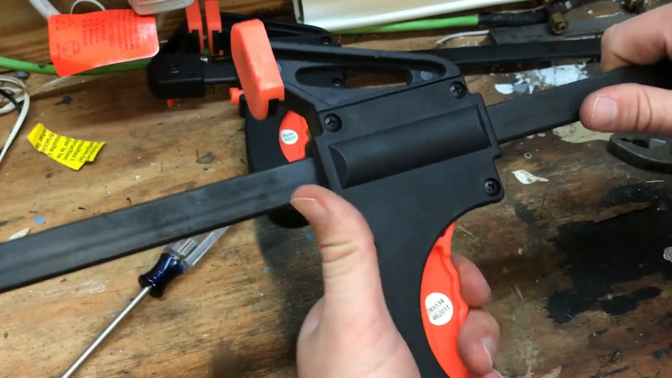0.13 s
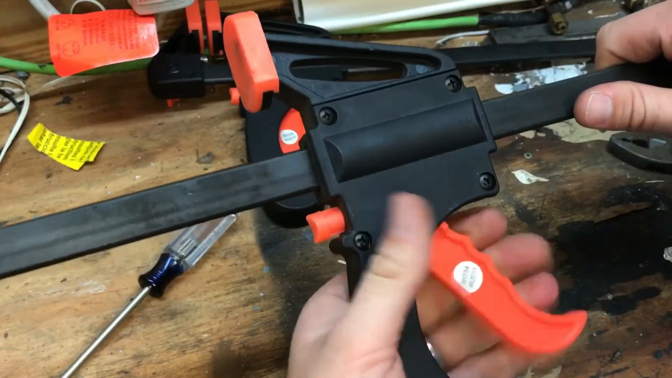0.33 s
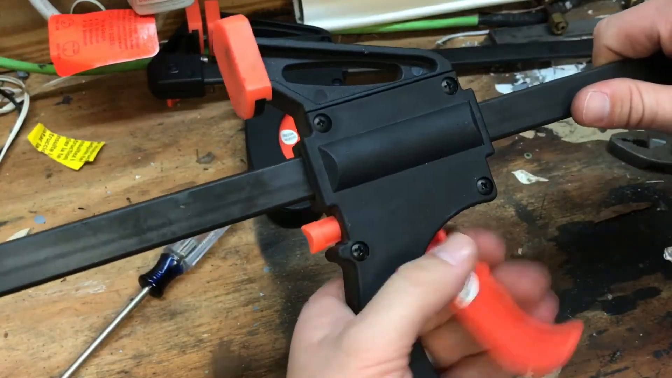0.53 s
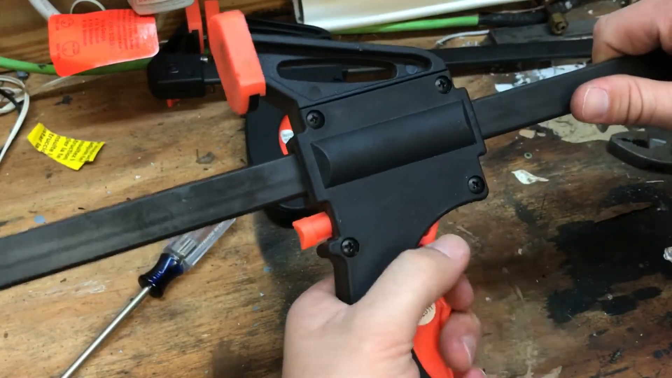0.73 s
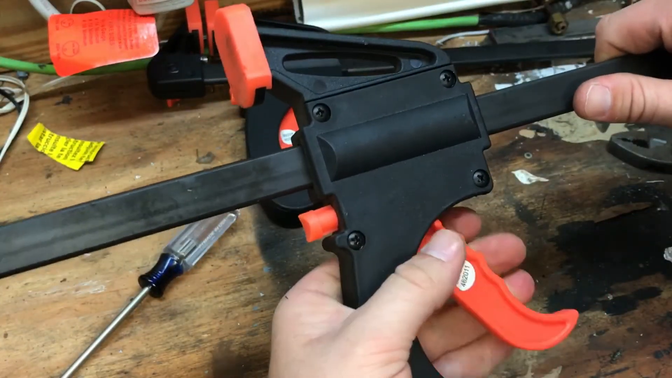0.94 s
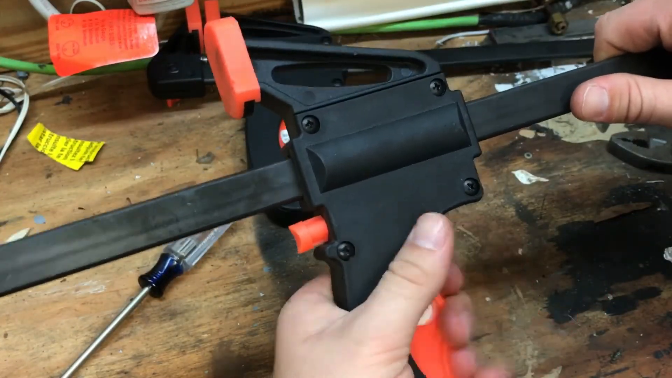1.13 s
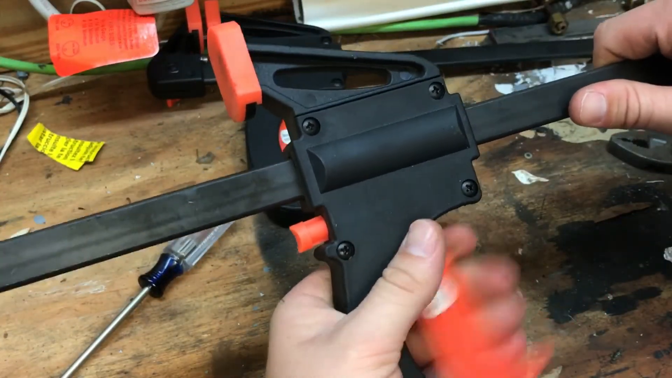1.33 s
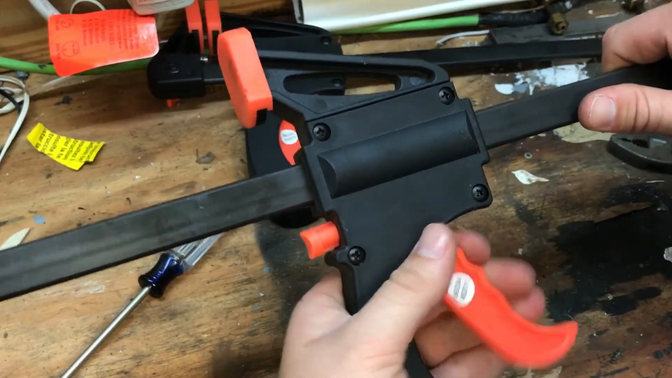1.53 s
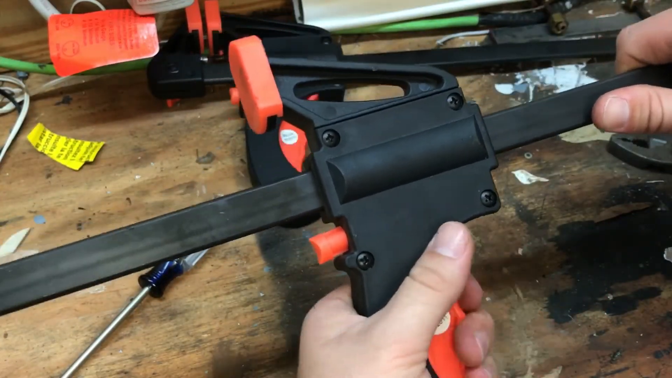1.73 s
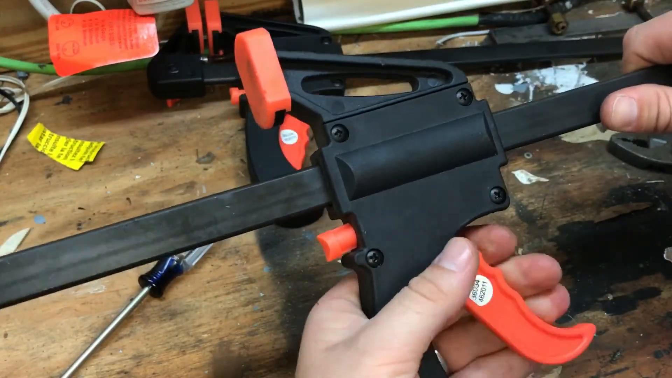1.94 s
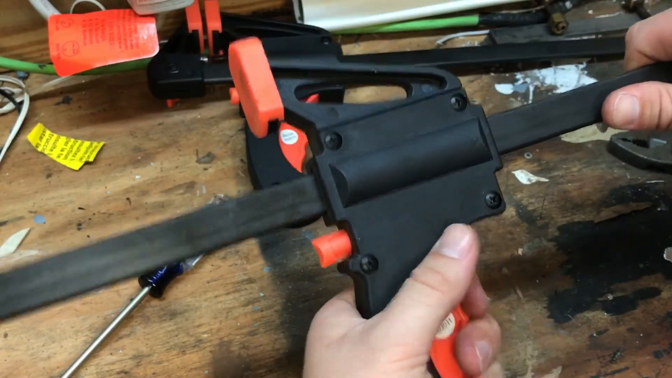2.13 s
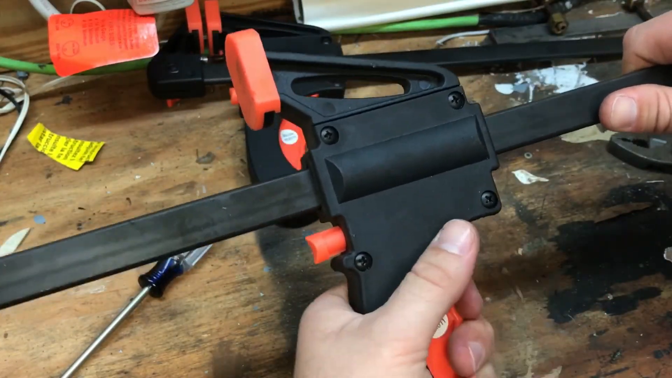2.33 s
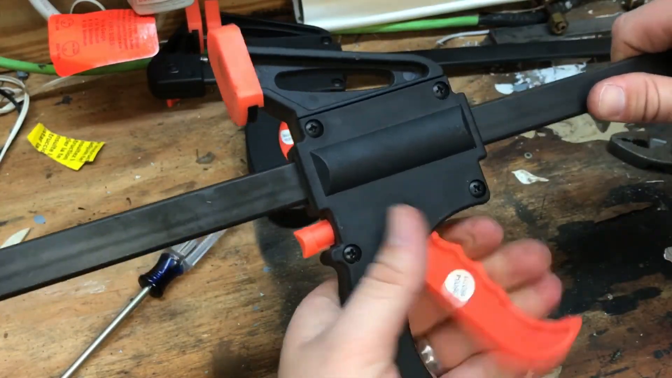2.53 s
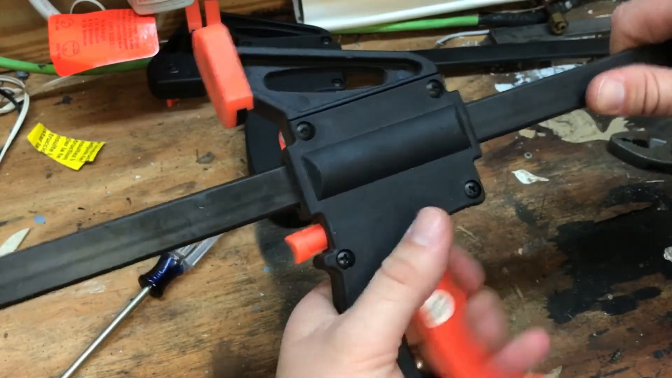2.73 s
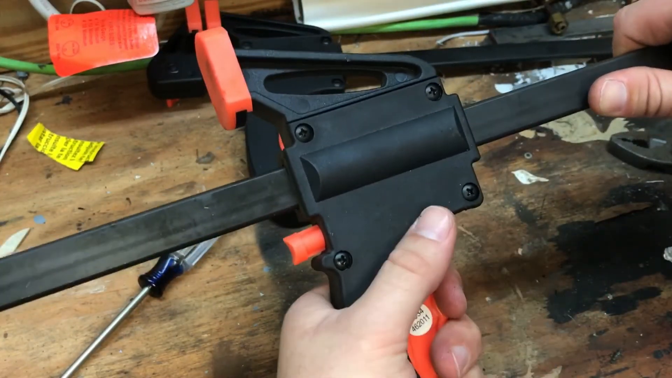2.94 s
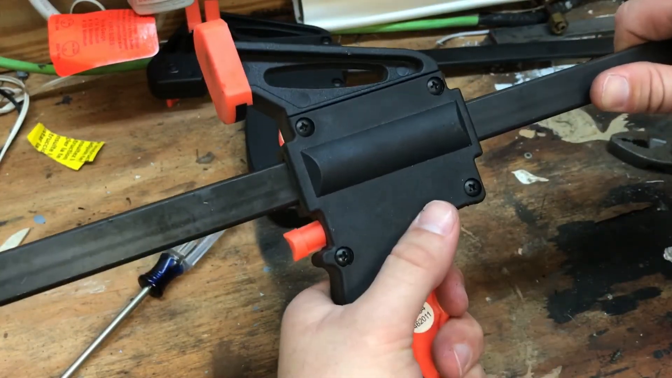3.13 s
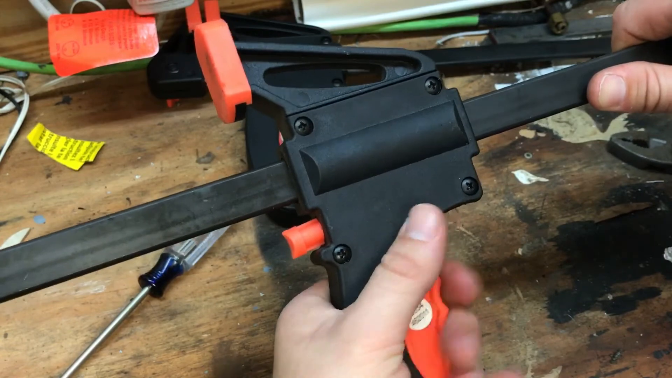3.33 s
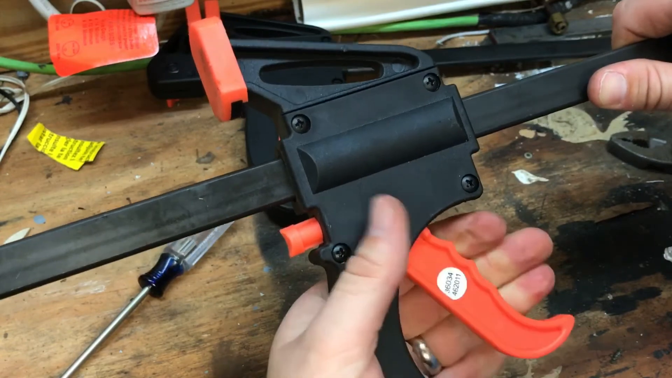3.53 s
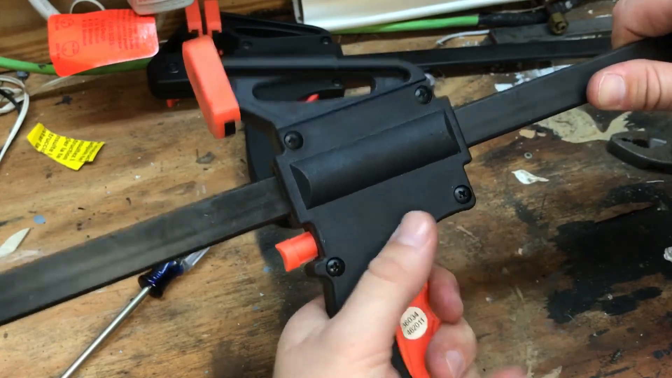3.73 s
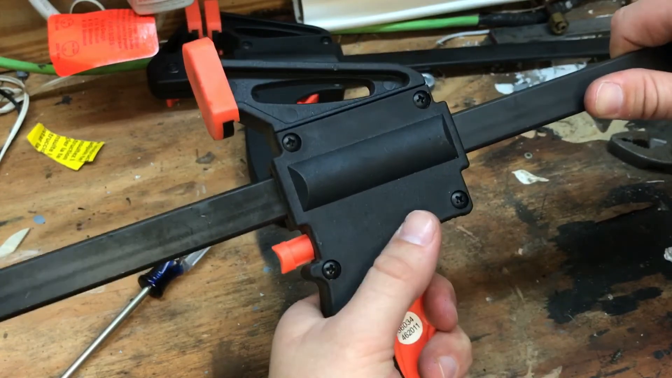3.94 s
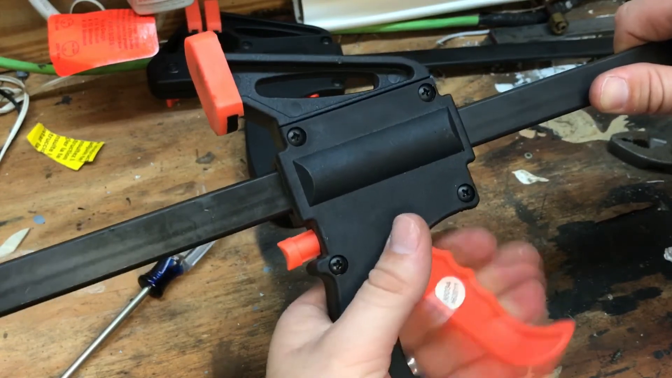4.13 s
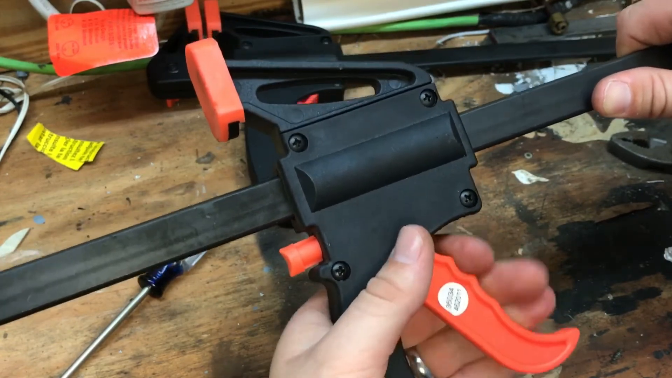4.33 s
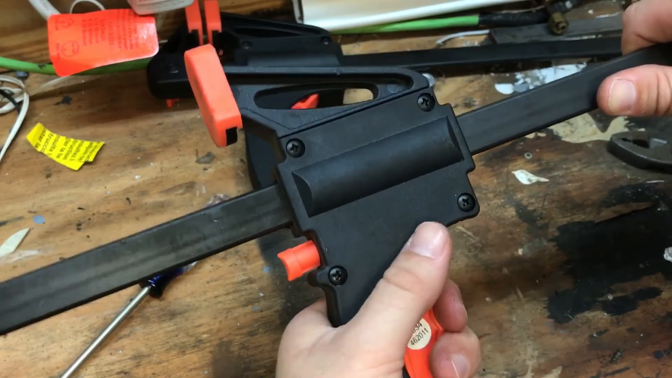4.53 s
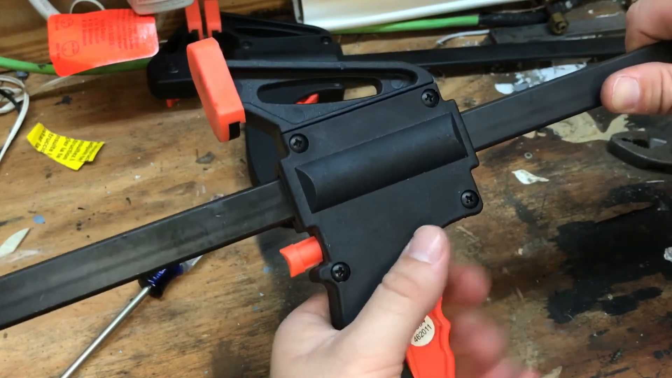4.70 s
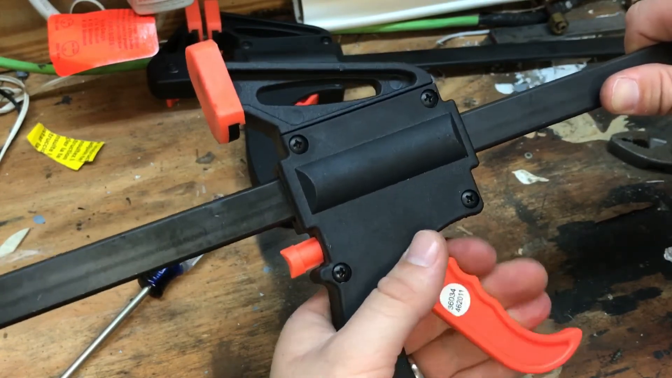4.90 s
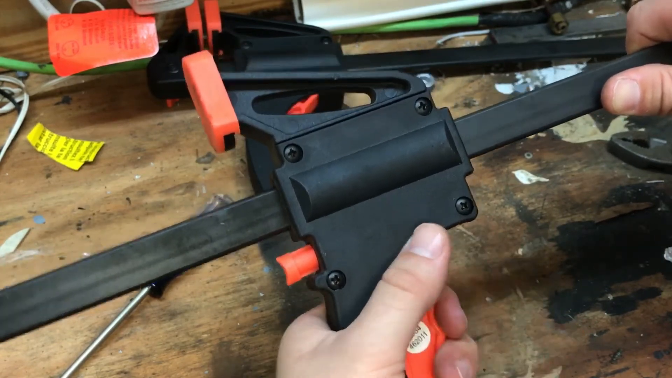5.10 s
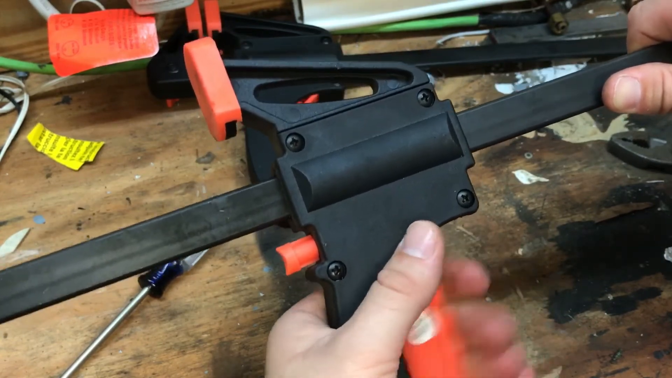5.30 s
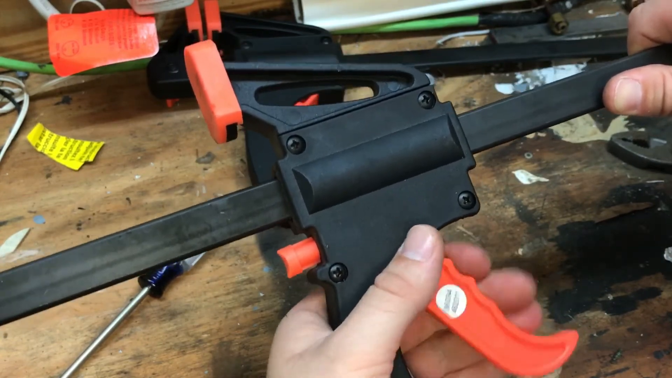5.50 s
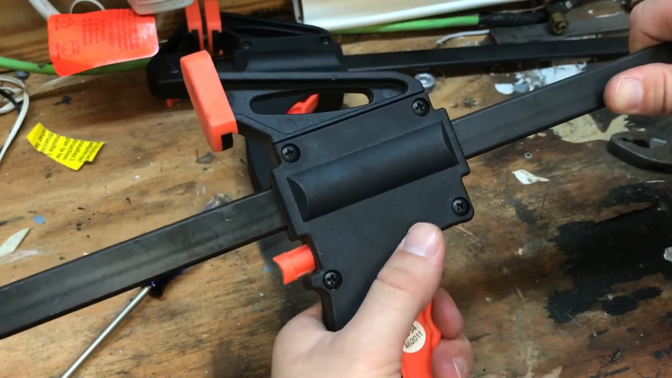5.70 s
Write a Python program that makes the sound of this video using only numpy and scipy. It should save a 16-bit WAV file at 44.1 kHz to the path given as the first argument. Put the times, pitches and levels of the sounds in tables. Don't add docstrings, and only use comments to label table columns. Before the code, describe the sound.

Dry mono close-up in a small workshop: loud, crisp plastic snaps alternate with quieter clicks and knocks as a clamp trigger is squeezed and released in uneven rhythm. Faint skin and plate scraping fills the movements, and a thin spring tone lingers after the snaps until the next squeeze stops it. Low duct rumble continues underneath, with a soft far-off horn chord near the end.

```python
import sys
import numpy as np
from scipy import signal
from scipy.fft import rfft, irfft, next_fast_len
from scipy.io import wavfile
from scipy.ndimage import uniform_filter1d

SR = 44100
rng = np.random.default_rng(int(sys.argv[2]) if len(sys.argv) > 2 else 0)


def transcribe(u):
    v = np.clip(np.atleast_2d(u).T, -1, 1)
    q = np.round(v * 32767).astype(np.int16)
    wavfile.write(sys.argv[1], SR, q)


def amplitude_ratio(level_db):
    exponent = np.asarray(level_db, float) / 20
    return 10 ** exponent


N = 254057


def level(x, db):
    return x * amplitude_ratio(db) / np.sqrt(np.mean(x ** 2))


def colour(x, points):
    hz, db = np.transpose(points)
    size = next_fast_len(x.shape[-1])
    f = np.fft.rfftfreq(size, 1 / SR) + 1
    gain = amplitude_ratio(np.interp(np.log(f), np.log(hz), db))
    return irfft(rfft(x, size) * gain, size)[:x.shape[-1]]


def curve(rows):
    return np.interp(np.arange(N) / SR, *np.transpose(rows))


def fade(t, t60):
    return np.exp(-np.log(1000) * t / t60)


def add(out, s, x):
    i = int(s * SR)
    out[i:i + len(x)] += x[:N - i]


def walk(rate):
    k = int(SR / rate)
    held = np.repeat(rng.standard_normal(N // k + 1), k)
    return uniform_filter1d(uniform_filter1d(held, k), k)[:N]


def air():
    # frequency in Hz, density in dB per Hz.
    flow_colour = [(18, -37), (33, -8), (42, -3), (60, -2.5), (89, -5), (255, -19.5), (359, -20.5),
                   (732, -39), (1060, -35.5), (1660, -40.5), (4900, -50), (12300, -48.5), (15200, -47.5),
                   (16500, -72.5)]
    # frequency in Hz, width in Hz, level in dB.
    ducts = [(58, 9.6, -61), (110.2, 0.53, -63)]
    out = level(colour(rng.standard_normal(N), flow_colour), -59)
    for hz, width, db in ducts:
        resonance = signal.lfilter(*signal.iirpeak(hz, hz / width, SR), rng.standard_normal(N))
        out += level(resonance, db) * amplitude_ratio(2.9 * walk(0.65))
    return out


def horn():
    # time in seconds, level in dB.
    blast = [
        (4.33, -87),
        (4.38, -60.5),
        (4.7, -61),
        (4.97, -62.5),
        (5.03, -91),
    ]
    # fundamental in Hz, level in dB, octave above in dB relative to the fundamental.
    pipes = [(316.5, 0, -14), (388.5, -6, -10), (510, -12, -15)]
    t = np.arange(N) / SR
    chord = np.zeros(N)
    for f, db, octave_db in pipes:
        tone = np.sin(2 * np.pi * f * t) + amplitude_ratio(octave_db) * np.sin(4 * np.pi * f * t)
        chord += amplitude_ratio(db + 1.7 * walk(12)) * tone
    sounding = (t > blast[0][0]) * (t < blast[-1][0])
    return amplitude_ratio(curve(blast)) * sounding * chord


def room(x):
    # frequency in Hz, t60 in seconds.
    decay = [(300, 0.15), (1000, 0.22), (3000, 0.23), (8000, 0.18), (15000, 0.4)]
    decay_hz, decay_s = np.transpose(decay)
    t = np.arange(SR // 2) / SR
    tail = 0
    for hz in 250 * 2 ** np.arange(0, 6.1, .5):
        t60 = np.interp(np.log(hz), np.log(decay_hz), decay_s)
        band = signal.lfilter(*signal.iirpeak(hz, 2.8, SR), rng.standard_normal((2, len(t))))
        tail = tail + band * fade(t, t60)
    tail = tail * np.clip(t / 0.004, 0, 1)
    tail = amplitude_ratio(-13.5) * tail / np.sqrt(np.sum(tail ** 2) / 2)
    x = x * (.35 + 1.3 * walk(900))
    one, other = signal.fftconvolve(x[None], tail, axes=1)[:, :N]
    turn = 2 * np.pi * .6 * walk(120)
    return one * np.cos(turn) + other * np.sin(turn)


def spring():
    # struck at s, caught by the hand at s, level in dB.
    rings = [(.414, 0.674, -56), (.986, 1.15, -57.5), (1.437, 1.67, -54), (1.956, 2.134, -64),
             (2.617, 2.767, -64.5), (3.517, 3.74, -62.5), (4.215, 4.443, -53), (4.84, 5.022, -53.5),
             (5.426, 5.61, -64)]
    # frequency in Hz, level in dB, t60 in seconds.
    modes = [
        (875.7, 0, 1.2),
        (837, -8, .7),
        (1989, -11, .4),
        (945, -10, .25),
    ]
    out = np.zeros(N)
    for start, stop, db in rings:
        t = np.arange(int((stop - start) * SR)) / SR
        ring = np.zeros(len(t))
        for hz, mode_db, t60 in modes:
            ring += amplitude_ratio(mode_db) * np.sin(2 * np.pi * (hz * t + rng.random())) * fade(t, t60)
        caught = np.clip((t[-1] - t) / 0.0041, 0, 1)
        add(out, start, amplitude_ratio(db) * ring * caught)
    return out


def hand():
    # start in seconds, end in seconds, level at start in dB, level at end in dB.
    moves = [(0., 0.095, -57, -74), (0.35, 0.742, -76.5, -90.5), (0.832, 0.984, -75.5, -62.5),
             (0.96, 1.373, -68.5, -69.5), (1.354, 1.748, -68, -70.5), (1.75, 2.094, -68, -77.5),
             (2.106, 2.23, -64, -76), (2.522, 2.698, -66.5, -71.5), (2.754, 2.889, -69, -67.5),
             (3.375, 3.522, -71, -70), (3.526, 3.664, -50.5, -71), (3.676, 3.937, -70, -68.5),
             (4.107, 4.22, -76, -69), (4.198, 4.597, -67, -94.5), (4.74, 4.857, -80.5, -62.5),
             (4.839, 5.249, -71, -69.5), (5.32, 5.437, -73, -58.5), (5.44, 5.755, -79.5, -95)]
    t = np.arange(N) / SR
    gain = np.zeros(N)
    for a, b, start_db, end_db in moves:
        moving = np.clip(np.minimum(t - a, b - t) / 0.0072 + .5, 0, 1)
        gain += amplitude_ratio(np.interp(t, (a, b), (start_db, end_db))) * moving
    return gain


def scrape():
    # start in seconds, end in seconds,
    # level in dB.
    skids = [(0.05, 0.07, -50), (0.37, 0.411, -49.5), (0.665, 0.697, -51.5), (1.204, 1.22, -38.5),
             (1.389, 1.467, -52.5), (1.699, 1.716, -44.5), (2.174, 2.191, -43.5), (2.825, 2.844, -47.5),
             (3.792, 3.806, -57), (2.574, 2.58, -54), (4.522, 4.535, -47), (5.092, 5.111, -42),
             (5.673, 5.683, -41)]
    # frequency in Hz, density in dB per Hz.
    skid_colour = [(240, -57.5), (400, -5.5), (1580, -13.5), (2510, -15.5), (3020, -4.5), (4310, -8),
                   (4950, -21.5), (6340, -13), (12900, -24), (16000, -39)]
    # frequency in Hz, density in dB per Hz.
    creep_colour = [(300, -9.5), (1000, 5), (2000, 1.5), (5000, -0.5), (9000, -6.5), (11000, -5),
                    (12200, -7), (14000, -5), (16000, -11)]
    t = np.arange(N) / SR
    grit = rng.standard_normal(N) * amplitude_ratio(6 * walk(300))
    skidding = sum(amplitude_ratio(db) * np.clip(np.minimum(t - a, b - t) / 0.0024, 0, 1) for a, b, db in skids)
    creep = level(colour(rng.standard_normal(N), creep_colour), 0) * hand() * amplitude_ratio(1.8 * walk(6.7))
    return level(colour(grit, skid_colour), 0) * skidding + creep


def contacts():
    # time in seconds, peak in dB, sharp edge in dB.
    ticks = [(0.009, -41, -4), (.022, -53, -12), (0.088, -51, -51), (0.2642, -51, 1), (0.3197, -73, -5),
             (0.3284, -52, -2), (0.8884, -53.5, 2.5), (1.3867, -40.5, -7), (1.63, -48.5, 1),
             (1.857, -57, 2), (1.892, -50.5, -1.5), (2.524, -55.5, 8), (2.55, -53.5, -19),
             (3.06, -67.5, -4), (3.3782, -52.5, -6.5), (3.3844, -54, -5), (3.435, -55, 8.5),
             (3.9002, -56, 2), (4.134, -56, 5), (4.1387, -57, 4), (4.147, -58.5, -9.5),
             (4.1873, -47.5, -10.5), (4.746, -54, 5), (4.761, -52, -9), (4.771, -53.5, -3.5),
             (4.803, -50, -2), (5.3214, -49, 1.5), (5.377, -50, -10), (3.7183, -49.5, -13),
             (4.573, -51.5, -35)]
    # time in seconds, peak in dB, strongest ring in Hz.
    take_ups = [(0.613, -46, 1300), (0.627, -46.5, 2110), (1.137, -44, 1300), (1.1468, -39, 1670),
                (1.62, -49, 1260), (1.6334, -49, 2190), (1.639, -49, 1170), (2.102, -44, 3310),
                (2.1157, -48, 2110), (2.7616, -45, 1900), (2.772, -45, 1300), (2.7745, -43, 1990),
                (3.7339, -34.5, 3280), (3.746, -40, 2010), (4.44, -49, 1500), (4.451, -43.5, 1630),
                (4.4563, -40.5, 1550), (5.0223, -40.5, 3090), (5.034, -47.5, 2140), (5.0384, -45, 1850),
                (5.5947, -33.5, 3480), (5.612, -36, 1820)]
    # time in seconds, peak in dB, strongest ring in Hz, edge in dB.
    bites = [(0.049, -58, 3230, 12.5), (0.635, -35, 4070, -2), (0.6408, -28.5, 1760, -1),
             (1.158, -32, 3200, -10), (1.1657, -28, 920, -2), (1.208, -31.5, 2920, -19),
             (1.6464, -35.5, 4250, -5), (1.655, -28, 1770, -2.5), (1.701, -35, 2980, -20),
             (2.128, -30.5, 4150, -1), (2.134, -31.5, 1720, -3.5), (2.7835, -39, 1680, -2),
             (2.7917, -29.5, 1740, -5), (2.7982, -43, 1730, -8), (3.7551, -35, 1043, -7),
             (3.7574, -44.5, 1370, 7.5), (4.4644, -37, 1350, -17), (4.4726, -39, 1670, -3.5),
             (5.0472, -39, 2000, -9), (5.056, -40, 1075, -7), (5.6216, -33.5, 2020, -22),
             (5.627, -30.5, 1390, -8.5)]
    # time in seconds, peak in dB, sharp edge in dB.
    stops = [(0.0607, -48, -7), (0.6626, -62, 14), (0.6677, -62, 1), (0.6832, -47.5, 0),
             (0.7057, -50.5, -29), (1.1949, -31.5, -14), (1.6876, -23.5, -10), (2.1678, -31, -13),
             (2.2251, -66.5, -24), (2.8252, -47, -10.5), (2.833, -59, -7), (2.8399, -38, -22),
             (2.8646, -48.5, -33), (3.8012, -34.5, -25), (3.833, -54, -24), (4.5132, -33, -11),
             (4.525, -35, -6), (4.5317, -35.5, -21), (5.078, -66, 18), (5.0903, -21.5, -11),
             (5.1073, -33.5, -30.5), (5.6611, -22.5, -6), (5.6781, -37.5, -19)]
    # time in seconds,
    # peak in dB.
    rebounds = [(3.5, -35), (5.1, -42), (2.1811, -38), (.4395, -51), (5.1445, -64.5)]
    # time in seconds, peak in dB, strongest ring in Hz,
    # chatter in ms.
    slips = [(0.3748, -32.5, 1480, 7.9), (0.398, -37.5, 1630, 2.1), (0.956, -40.5, 1330, 5.1),
             (0.9677, -24.5, 1136, 2.8), (0.9746, -25.5, 1320, 1.9), (1.3973, -38.5, 1500, 1.3),
             (1.409, -54.5, 2510, 11), (1.422, -31.5, 1270, 1.2), (1.9109, -37.5, 4336, 5.4),
             (1.9222, -37, 1073, 0.45), (1.9366, -36, 1350, 5), (1.948, -41.5, 1837, 5.8),
             (2.579, -34.5, 1566, 5.6), (2.5998, -31, 1345, 5), (3.4392, -49.5, 1584, 2.6),
             (3.493, -39, 1536, 0.37), (3.495, -36, 1360, 0.8), (3.5028, -34.5, 3090, 4.4),
             (4.1954, -34, 1270, 4.2), (4.2253, -24, 1104, 1), (4.8148, -33.5, 1590, 24),
             (4.8256, -28, 1300, 0.67), (5.386, -36.5, 1530, 1.6), (5.396, -40, 1410, 0.67),
             (5.4068, -32, 1225, 2.3)]
    # time in seconds, peak in dB, strongest ring in Hz, edge in dB,
    # chatter in ms.
    snaps = [(0.4134, -11.5, 1637, -6, 2.63), (0.9848, -10, 1995, -2, 4.67), (1.4363, -8, 3670, -4, 1.57),
             (1.9549, -14.5, 1240, -6, 2.08), (2.6153, -15.5, 1140, -10.5, 2.6),
             (3.51, -15, 4160, -12.5, 1.76), (3.5148, -11, 1927, 2.6, 1.74), (3.5264, -10, 2100, -0.5, 1.4),
             (4.2086, -17.5, 3730, -7.5, 2.7), (4.2172, -10.5, 1282, -6, 0.6),
             (4.8407, -12, 1190, -3.5, 3.9), (5.4255, -19, 1300, -4.5, 1.8)]
    # time in seconds, peak in dB, strongest ring in Hz, edge in dB.
    jumps = [(0.9965, -24.5, 3400, -9.5), (1.429, -40, 2170, 2), (1.4419, -24.5, 6800, -1),
             (1.9393, -32.5, 1300, -6.5), (3.5186, -16.5, 1500, -5), (3.5231, -20.5, 1300, -3),
             (3.5383, -21.5, 2200, -3), (4.2235, -25, 6740, -3.5), (4.2336, -31, 1100, -15),
             (5.4213, -35, 2220, -7.5), (5.4337, -31.5, 1300, -9.5)]
    rows = [(s, db, -4, edge, 1500, 0.98) for s, db, edge in ticks]
    rows += [(s, db, -5, -6.5, hz, 1.36) for s, db, hz in take_ups]
    rows += [(s, db, -0.5, edge, hz, 1) for s, db, hz, edge in bites]
    rows += [(s, db, 4 + 0.39 * (-40.5 - db), edge, 1571, 0.71) for s, db, edge in stops]
    rows += [(s, db, 11, -14, 1300, 4) for s, db in rebounds]
    rows += [(s, db, -1.4, -4, hz, ms) for s, db, hz, ms in slips]
    rows += [(s, db, -5, edge, hz, ms) for s, db, hz, edge, ms in snaps]
    rows += [(s, db, 0, edge, hz, 0.91) for s, db, hz, edge in jumps]
    return [(s, db, body - 4.5 * max(np.log2(hz / 1500), 0), edge, hz, ms)
            for s, db, body, edge, hz, ms in rows]


def housing_rings(t, ring_hz, edge_db):
    # frequency in Hz, level in dB.
    housing = [(600, -18), (830, -28), (1130, -7.5), (1270, 25.5), (1550, 16), (1680, -17), (1980, -3),
               (2250, 16), (2600, -2), (3150, 4), (3600, 6), (4050, -13.5), (4300, -0.5), (4700, -11.5),
               (5650, -12.5), (6200, -1), (6900, 14.5), (7400, -6), (8800, 15), (9600, -22.5), (11500, -11),
               (12600, -3), (14000, -31)]
    hz, mode_db = np.transpose(housing)
    t60 = np.minimum(16 / hz + .003, .013)
    level_chance, pitch_chance = rng.standard_normal((2, len(hz)))
    near_db = 4 * np.exp(-(np.log(hz / ring_hz) / 0.014) ** 2)
    gain = amplitude_ratio(mode_db + near_db + 2 * level_chance)
    modes = np.sin(2 * np.pi * np.outer(hz * (1 + 0.03 * pitch_chance), t)) * fade(t, t60[:, None])
    hollow = amplitude_ratio(-19.5 - edge_db) * np.sin(2 * np.pi * ring_hz * t) * fade(t, 0.036)
    return gain @ modes + gain.max() * hollow


def blow(t, edge_db, ring_hz, chatter_ms):
    # frequency in Hz, level in dB.
    crack_colour = [(200, -3), (600, -3.5), (1000, -0.5), (2700, -4), (4000, -2), (8000, -11),
                    (10500, -5.5), (12500, -10), (16000, -34.5)]
    strike = int(.0005 * SR)
    crack, grit, unevenness = rng.standard_normal((3, len(t)))
    push = (1 - np.exp(-t / .0006)) * np.exp(-(1000 * t / chatter_ms / 1.6) ** 1.5)
    chatter = grit * (1 + np.abs(unevenness)) * push
    chatter[strike] += amplitude_ratio(12.5)
    hit = signal.fftconvolve(housing_rings(t, ring_hz, edge_db), chatter)[:len(t)]
    hit = hit / np.abs(hit).max()
    hit += amplitude_ratio(6 + 0.5 * min(edge_db - 0.5, 0)) * colour(crack, crack_colour) * push / 2
    hit[strike] += amplitude_ratio(4)
    hit += amplitude_ratio(-7) * grit * np.abs(unevenness) * fade(t, 0.028) * np.minimum(t / 0.0091, 1)
    return hit


def clicks():
    # lower band edge in Hz, level in dB; the last row closes the top band.
    shell = [(250, -4.5), (520, 3), (720, -5.5), (980, 1), (1400, -0.5), (1800, -1.5), (2500, -4.5),
             (3050, -6.5), (3500, -4), (4400, -7.5), (5200, 1), (6400, 0), (7800, -1), (10500, -1.5),
             (14700, 0)]
    # time in seconds, frequency in Hz, level in dB.
    overtones = [(0.4135, 3860, 2.5), (0.9849, 3900, 6), (1.1652, 4920, 8.5), (1.1954, 3125, 3),
                 (1.4364, 1300, 5.5), (1.6865, 1294, 1.5), (1.9545, 2520, 2.5), (2.1684, 3260, 3.5),
                 (2.6163, 1500, 2), (3.51, 5330, 2), (3.5147, 1400, 11), (3.5271, 3850, 7),
                 (4.2091, 1200, 0.5), (4.2172, 3270, 3), (4.5136, 3200, 1), (4.8414, 3540, 3.5),
                 (5.0893, 3160, 4.5), (5.4251, 3140, 3.5), (5.6613, 3280, 6)]
    out, t = np.zeros(N), np.arange(2048) / SR
    edge_hz, shell_db = np.transpose(shell)
    centre = np.sqrt(edge_hz[1:] * edge_hz[:-1])
    bands = [signal.butter(2, e, "bandpass", fs=SR, output="sos") for e in zip(edge_hz, edge_hz[1:])]
    region = np.searchsorted((730, 1800, 5000), centre)

    def favour(hz):
        return np.exp(-(np.log2(centre / hz) / .2) ** 2)

    for s, db, body_db, edge_db, ring_hz, chatter_ms in contacts():
        hit = blow(t, edge_db, ring_hz, chatter_ms)
        region_db = np.array((body_db - 14.5, body_db, 0, edge_db))
        parts_db = region_db[region] + shell_db[:-1] + 5 * favour(ring_hz)
        for at, hz, over_db in overtones:
            if abs(at - s) < .003:
                parts_db += over_db * favour(hz)
        for band, part_db in zip(bands, parts_db):
            part = signal.sosfilt(band, hit)
            add(out, s, part * amplitude_ratio(db + part_db) / np.abs(part).max())
    return out


def scene():
    clamp = clicks() + scrape()
    return (air() + horn() + room(clamp) + spring() + clamp)[None]


def band_limit(x):
    return signal.sosfilt(signal.butter(12, 16970, fs=SR, output="sos"), x)


def record(dry):
    top = signal.ellip(8, .2, 32, 15900, fs=SR, output="sos")
    bottom = signal.butter(5, 35, "highpass", fs=SR, output="sos")
    mix = signal.sosfilt(np.vstack([top, bottom]), dry)
    return band_limit(mix)


dry = scene()
out = record(dry)
transcribe(out)
```